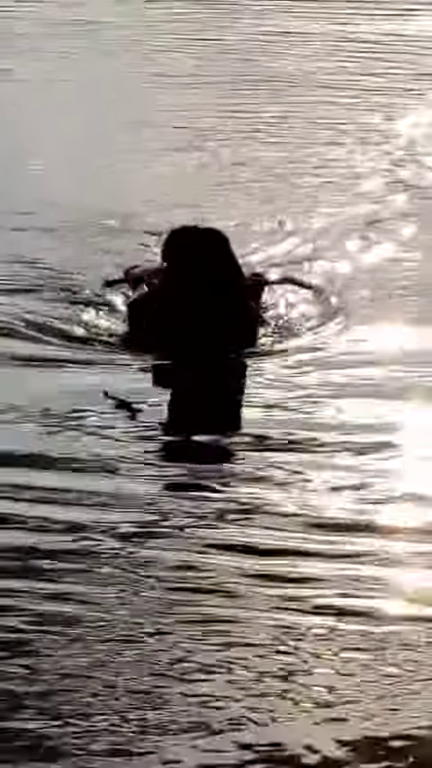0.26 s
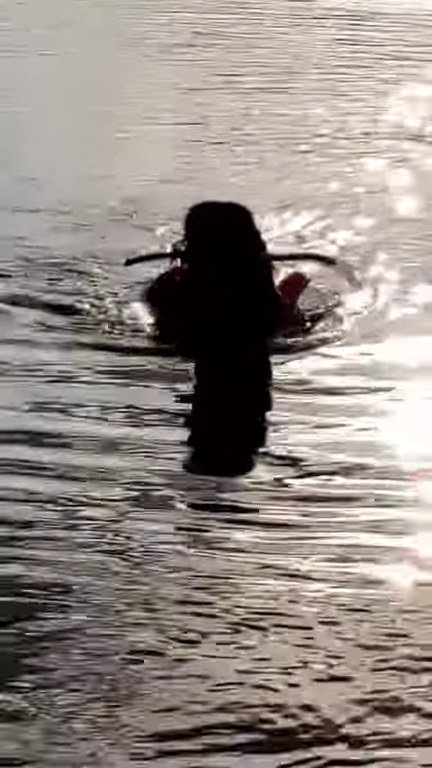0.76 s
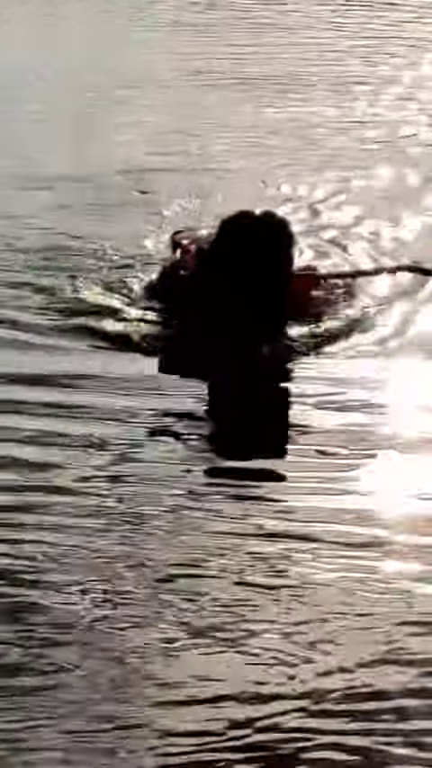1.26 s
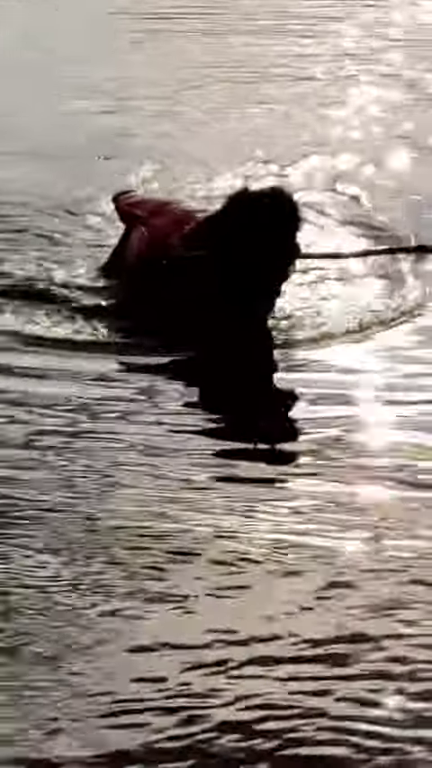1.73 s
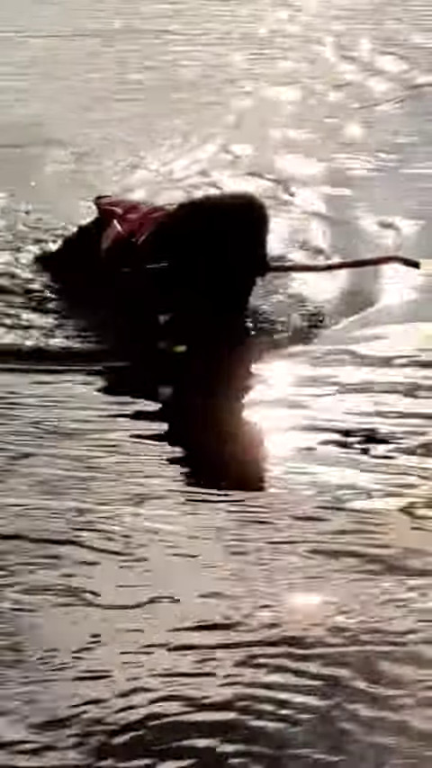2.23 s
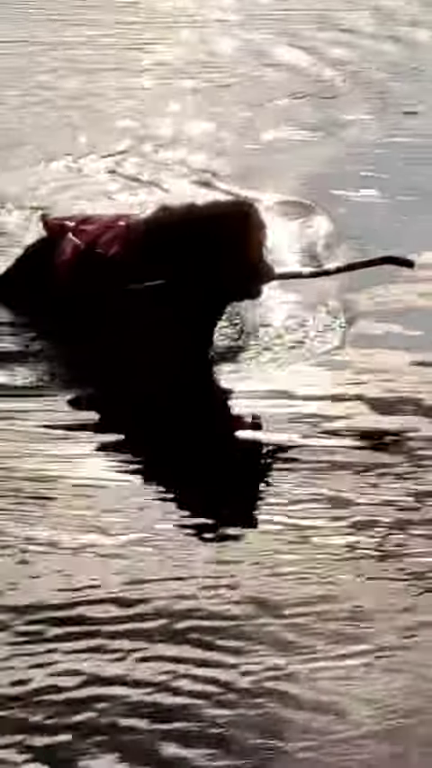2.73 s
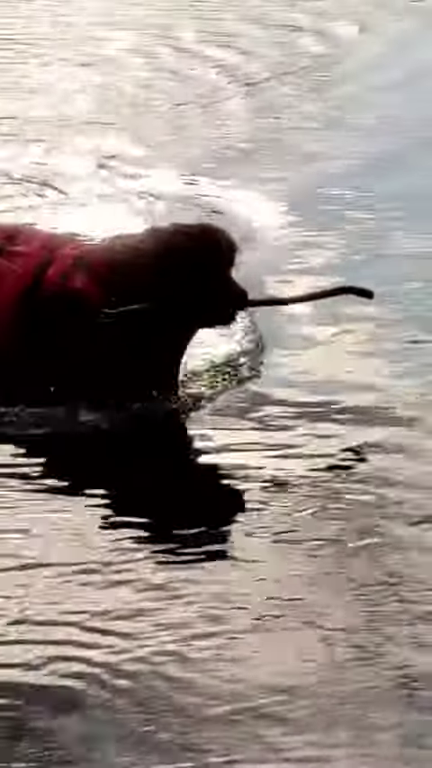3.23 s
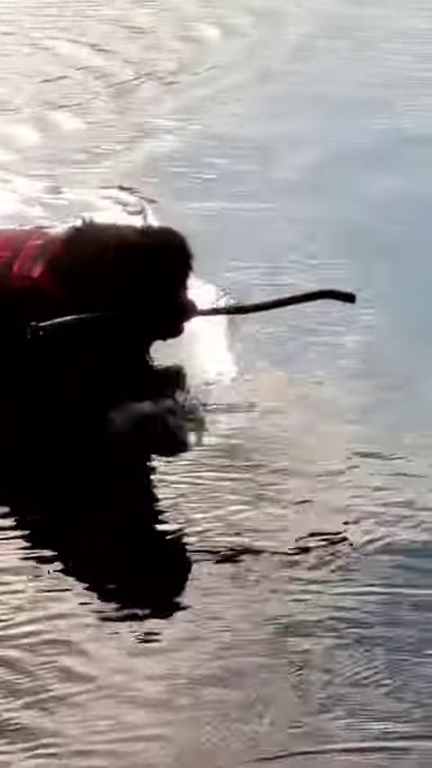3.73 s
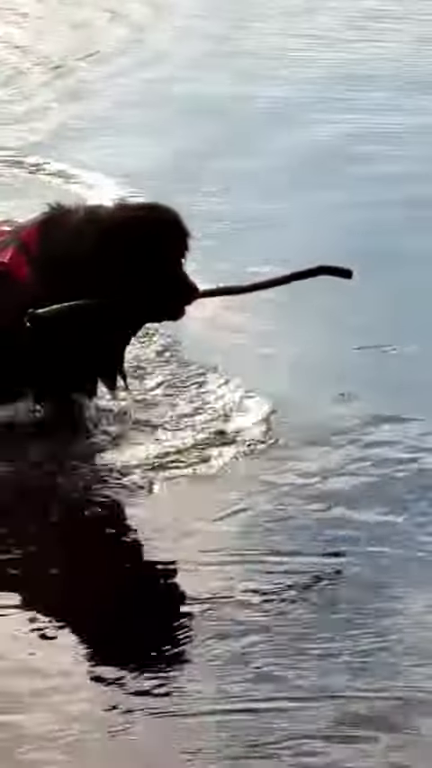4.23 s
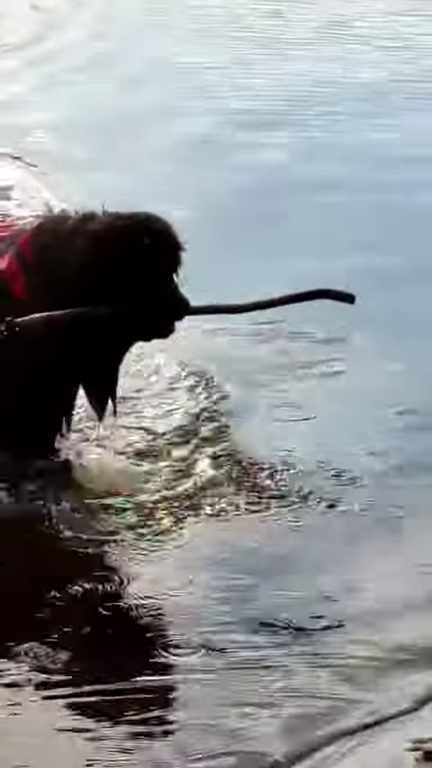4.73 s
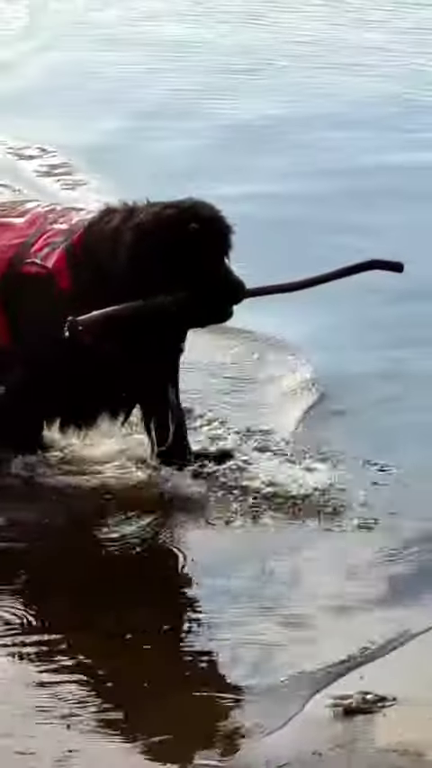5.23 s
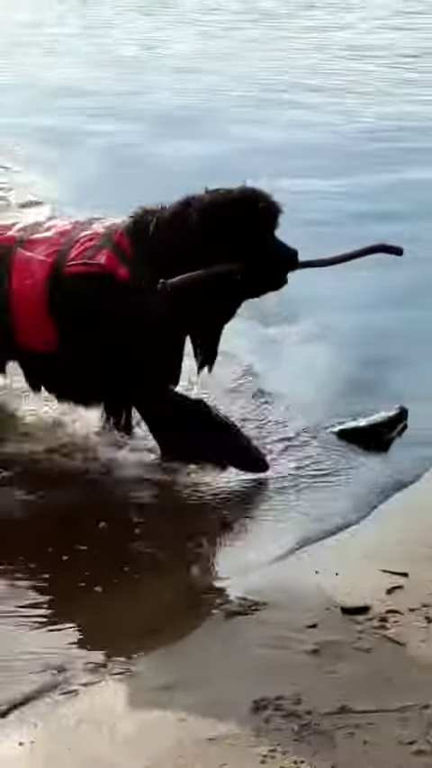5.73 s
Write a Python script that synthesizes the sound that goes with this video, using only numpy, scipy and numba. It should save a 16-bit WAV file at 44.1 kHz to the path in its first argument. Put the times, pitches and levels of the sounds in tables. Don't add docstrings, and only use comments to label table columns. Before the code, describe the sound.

Quiet watery paddling and a lull, then heavy wading splashes with gurgling bubbles and fine spray, over a low distant outdoor rumble.

```python
import sys
import numpy as np
from scipy import signal
from scipy.fft import rfft, irfft
from scipy.io import wavfile
from scipy.ndimage import uniform_filter1d
from numba import njit

SR = 44100
rng = np.random.default_rng(int(sys.argv[2]) if len(sys.argv) > 2 else 0)


def wav_record(signal):
    frames = np.transpose(np.atleast_2d(signal))
    bounded = np.clip(frames, -1, 1)
    quanta = np.round(bounded * 32767).astype(np.int16)
    wavfile.write(sys.argv[1], SR, quanta)


def magnitude_from_level(level_db):
    exponent = np.asarray(level_db, float) / 20
    return 10 ** exponent


N = 263277
HZ = np.maximum(np.arange(N // 2 + 1) * SR / N, 1)

# (frequency [Hz], level [dB])
WATER = [(100, -38), (170, 2.5), (500, -1.5), (1200, -7), (2240, -10.5), (2800, -14.5), (3200, -18.5),
         (4300, -23.5), (5700, -20), (7200, -13.5), (8600, -19), (9800, -31.5), (11500, -35), (14600, -35),
         (15700, -36)]


def rms_one(x):
    return x / np.sqrt(np.mean(x ** 2) + 1e-20)


def in_time(rows):
    s, *columns = np.transpose(rows)
    return [np.interp(np.arange(N) / SR, s, c) for c in columns]


def at_hz(points):
    hz, value = np.transpose(points)
    return np.interp(np.log(HZ), np.log(hz), value)


def band(low_hz, high_hz, order=3):
    low_cut = 1 + (low_hz / HZ) ** (2 * order)
    high_cut = 1 + (HZ / high_hz) ** (2 * order)
    return 1 / np.sqrt(low_cut * high_cut)


def drift(rate):
    r = np.exp(-80 * np.pi * rate / SR)
    coarse = rng.standard_normal(N // 40 + 2002)
    slow = signal.lfilter([1], [1, -2 * r, r * r], coarse)[2000:]
    return np.interp(np.arange(N) / 40, np.arange(len(slow)), rms_one(slow))


def wake():
    # (time [s], level [dB])
    churn = [(0, -63), (0.55, -62.5), (0.68, -68), (0.85, -63), (1.25, -61.5), (1.51, -74), (2.14, -68),
             (2.86, -73), (2.97, -60), (3.22, -58), (3.39, -63), (3.62, -55), (3.92, -47.5), (4.32, -55.5),
             (4.6, -53), (4.73, -61), (5.09, -50), (5.97, -50.5)]
    mean_churn_db = -60
    churn_db = in_time(churn)[0] - mean_churn_db
    slow_db = uniform_filter1d(churn_db, round(0.45 * SR))
    t = np.arange(N) / SR
    footing_s, shallows_s = 3.3, 5.1
    depth_db = 2.0 * np.minimum(t, footing_s) - 10 * np.maximum(t - shallows_s, 0)
    spray_surge, trickle_surge = surges()

    gurgle = swarm(count=3000, low_hz=190.8, high_hz=1266, cycles=19.0, uneven_db=2.5, clump_db=0.33, lag_spread=5.6)
    trickle = swarm(count=15000, low_hz=1216, high_hz=3910, cycles=18.0, uneven_db=2.5, clump_db=0.82, lag_spread=2.1)
    drops = swarm(count=7000, low_hz=3640, high_hz=10040, cycles=25.0, uneven_db=2.6, clump_db=2.5, lag_spread=1.5)
    fizz = swarm(count=40000, low_hz=3340, high_hz=16100, cycles=3.2, uneven_db=3.0, clump_db=0.7, lag_spread=0.76)
    spray = magnitude_from_level(-7) * drops + magnitude_from_level(-4.0) * fizz

    gurgle_level = magnitude_from_level(-58 + 0.5 * slow_db + depth_db)
    trickle_level = np.hypot(magnitude_from_level(-63.5 + 0.8 * churn_db), magnitude_from_level(-1.8) * trickle_surge)
    spray_level = np.hypot(magnitude_from_level(mean_churn_db - 2.5 + churn_db), magnitude_from_level(-0.6) * spray_surge)
    return gurgle_level * gurgle + trickle_level * trickle + spray_level * spray


def surges():
    # (time [s], spray [dB], trickle [dB], rise [s per 10 dB], fall [s per 10 dB])
    strokes = [(0.05, -56, -70, 0.05, 0.07), (0.08, -68, -49.5, 0.02, 0.018),
               (0.155, -58, -52.5, 0.03, 0.1), (0.28, -56, -62, 0.05, 0.05), (0.38, -55, -45, 0.02, 0.02),
               (0.45, -50, -54, 0.04, 0.045), (0.51, -56, -61, 0.012, 0.13), (0.75, -56, -53, 0.02, 0.008),
               (0.78, -70, -55, 0.01, 0.025), (1.05, -72, -50.5, 0.023, 0.009),
               (1.31, -70, -60, 0.08, 0.04), (2.18, -63, -76, 0.05, 0.022), (2.39, -66, -76, 0.02, 0.15),
               (2.58, -68, -76, 0.06, 0.12)]
    # (time [s], spray [dB], trickle [dB], rise [s per 10 dB], fall [s per 10 dB])
    strides = [(2.93, -61, -56, 0.027, 0.022), (2.99, -62, -56, 0.02, 0.2), (3.24, -55, -49, 0.2, 0.018),
               (3.3, -54, -54, 0.05, 0.06), (3.64, -49.5, -58, 0.06, 0.04), (3.72, -50, -54, 0.02, 0.05),
               (3.79, -56, -49, 0.15, 0.04), (3.86, -47.5, -49.5, 0.05, 0.08), (4.04, -48, -52, 0.15, 0.04),
               (4.16, -47, -52, 0.05, 0.08), (4.465, -46, -47.5, 0.13, 0.06), (4.57, -52, -60, 0.06, 0.1),
               (4.67, -48, -60, 0.03, 0.035), (4.92, -58, -49, 0.11, 0.04), (5.1, -40, -48, 0.012, 0.055),
               (5.19, -44, -48, 0.1, 0.015), (5.45, -60, -48, 0.2, 0.025), (5.56, -49, -47, 0.13, 0.2),
               (5.65, -58, -51, 0.04, 0.07), (5.8, -43.5, -50, 0.05, 0.12), (5.96, -62, -51, 0.02, 0.05)]
    t, out = np.arange(N) / SR, np.zeros((2, N))
    for s, spray_db, trickle_db, rise, fall in strokes + strides:
        near = slice(max(round((s - .5) * SR), 0), round((s + .5) * SR))
        shape = magnitude_from_level(-10 * np.maximum((s - t[near]) / rise, (t[near] - s) / fall))
        peaks = magnitude_from_level(np.array([[spray_db], [trickle_db]]))
        out[:, near] = np.maximum(out[:, near], peaks * shape)
    return out


def swarm(count, low_hz, high_hz, cycles, uneven_db, clump_db, lag_spread):
    when, pitch, big, long, sign = rng.random((5, count))
    hz = low_hz / 1.331 * (1.61 * high_hz / low_hz) ** pitch
    uneven = magnitude_from_level(uneven_db * np.minimum(-np.log(big), 5))
    size = hz * uneven * np.sign(sign - .5)
    lag = lag_spread * rng.standard_normal(count)
    rings = bubbles(when * N, size, hz, cycles * (.5 + long), np.full(count, .25), lag)
    clumps = magnitude_from_level(clump_db * (drift(6.4) + 0.27 * drift(16.7)))
    colour = magnitude_from_level(at_hz(WATER)) * band(low_hz, high_hz)
    return rms_one(irfft(rfft(rings * clumps) * colour, N))


@njit
def bubbles(start, size, hz, cycles, rise, lag):
    out = np.zeros((2, N))
    for k in range(len(start)):
        life = cycles[k] / hz[k] * SR
        for side in range(2):
            first = start[k] + (lag[k] if side == 0 else 0.)
            for i in range(max(int(first) + 1, 0), min(int(first + life), N)):
                age = (i - first) / life
                turns = cycles[k] * age * (1 + np.log(2) * rise[k] * (age - .3))
                envelope = min(8 * age, 1.) * np.exp(-np.log(1000) * age)
                out[side, i] += size[k] * envelope * np.sin(2 * np.pi * turns)
    return out


def plops(rows, gain_db, rise_octaves):
    s, db, hz, cycles = np.transpose(rows)
    return bubbles(s * SR, magnitude_from_level(db + gain_db), hz, cycles, np.full(len(s), rise_octaves), np.zeros(len(s)))


def gulps():
    # (time [s], peak [dB], pitch [Hz], length [cycles])
    leg_pockets = [(0.22, -36, 392, 10), (0.374, -32.5, 363, 16.5), (0.42, -35, 270, 11),
                   (2.95, -37, 250, 15), (3.157, -36, 355, 15), (3.188, -35, 200, 7.3),
                   (3.36, -37, 480, 26), (3.37, -33.5, 248, 9.3), (3.394, -34.5, 450, 18),
                   (3.561, -37, 406, 15), (3.6, -37.5, 380, 20), (3.847, -24, 420, 9.1),
                   (3.855, -27.5, 349, 20), (3.885, -28.5, 415, 6.2), (3.954, -33.5, 470, 23),
                   (4.082, -29, 450, 7), (4.091, -32, 495, 21), (4.204, -44, 407, 5.7),
                   (4.449, -27.5, 256, 6.4), (4.955, -37, 484, 24), (5.002, -33, 370, 15),
                   (5.015, -34, 296, 7.6), (5.057, -37, 606, 12), (5.105, -26.5, 495, 15),
                   (5.135, -38, 355, 8.8), (5.484, -34.5, 281, 24), (5.509, -35, 347, 22),
                   (5.535, -33.5, 232, 11)]
    # (time [s], peak [dB], pitch [Hz], length [cycles])
    chest_pockets = [(0.107, -42, 890, 20), (0.381, -34, 823, 33), (3.021, -38, 980, 16),
                     (3.52, -41, 895, 18), (3.752, -32, 1070, 22), (3.772, -34, 695, 22),
                     (3.858, -31.5, 1040, 18), (4.448, -29.5, 590, 15), (4.462, -25, 830, 8.6),
                     (4.914, -35, 730, 26), (5.176, -33, 720, 16), (5.186, -34, 703, 21),
                     (5.194, -28.5, 840, 9.6), (5.321, -35, 746, 26), (5.816, -32, 1170, 26)]
    return plops(leg_pockets + chest_pockets, gain_db=5.0, rise_octaves=0.17)


def drips():
    # (time [s], peak [dB], pitch [Hz], length [cycles])
    falling_drops = [(0.078, -32, 2010, 45), (0.189, -35, 1820, 30), (0.341, -38, 1990, 22),
                     (0.7327, -34.5, 1900, 24), (0.7874, -41, 1300, 16), (1.0399, -32, 2030, 55),
                     (1.3104, -41, 1540, 33), (2.2748, -40, 2220, 60), (2.68, -43, 1580, 30),
                     (2.9194, -42, 2010, 28), (2.982, -37.5, 1390, 43), (3.2719, -37, 1460, 20),
                     (3.6925, -37, 1960, 26), (3.7714, -32, 2070, 34), (3.8346, -32, 2170, 32),
                     (3.9094, -38, 1610, 20), (4.0022, -37, 1690, 27), (4.3364, -32.5, 2190, 60),
                     (4.4466, -31, 2040, 52), (5.0713, -31, 2100, 27), (5.106, -26.5, 2170, 60),
                     (5.3257, -38, 1930, 24), (5.4539, -32, 1330, 24), (5.5203, -35, 2230, 42),
                     (5.547, -31.5, 1210, 24), (5.6451, -32.5, 2100, 51), (5.8163, -23, 1500, 33),
                     (5.8324, -27.5, 1500, 31), (5.957, -27.5, 2340, 20), (0.222, -40, 1350, 20),
                     (0.42, -38, 3450, 30), (0.783, -41, 2400, 14), (1.05, -43, 3300, 30),
                     (3.0405, -45, 2770, 30), (3.494, -47, 2430, 30), (3.6322, -42, 2690, 25),
                     (3.7304, -37, 2510, 30), (3.7928, -40, 2580, 25), (4.122, -37, 2050, 25),
                     (4.376, -39, 2330, 30), (4.4757, -37, 2840, 25), (4.8908, -38, 2680, 25),
                     (5.367, -40, 3100, 35), (5.3962, -39, 2610, 30), (5.418, -39, 2850, 35),
                     (5.5468, -35, 2600, 40), (5.6361, -40, 2640, 30), (5.7768, -38, 2680, 35),
                     (5.793, -38, 3050, 40)]
    return plops(falling_drops, gain_db=-2.0, rise_octaves=0.2)


def spits():
    # (time [s], peak [dB], t60 [s])
    films = [(2.9562, -39.5, 0.016), (2.9926, -44, 0.023), (3.116, -48, 0.025), (3.2844, -49, 0.025),
             (3.4201, -49, 0.025), (3.487, -48, 0.023), (3.6329, -32, 0.018), (3.722, -37, 0.011),
             (3.79, -37.5, 0.025), (3.8437, -39, 0.055), (3.8846, -33, 0.025), (4.0882, -38, 0.023),
             (4.1444, -32, 0.029), (4.1999, -42, 0.048), (4.231, -41, 0.022), (4.347, -45.5, 0.019),
             (4.374, -36, 0.029), (4.4558, -34, 0.017), (4.671, -36, 0.024), (4.824, -46.5, 0.033),
             (4.8783, -47.5, 0.034), (5.1543, -36, 0.021), (5.3013, -38.5, 0.025), (5.351, -42, 0.025),
             (5.39, -30, 0.01), (5.493, -31, 0.0083), (5.5702, -39.5, 0.019), (5.7254, -36, 0.012),
             (5.768, -39, 0.043), (5.9284, -40, 0.022), (3.0525, -50, .015), (3.1607, -47, .015),
             (3.2286, -47, .015), (3.2495, -45, .012), (3.3294, -47, .015), (3.4057, -48, .012),
             (3.4621, -51, .012), (3.5548, -51, .015), (3.6007, -46, .015), (3.6616, -46, .015),
             (4.0243, -38, .015), (4.5685, -42, .015), (4.7217, -49, .015), (4.9108, -47, .015),
             (4.9592, -47, .015), (5.0544, -47, .015), (5.233, -46, .015), (5.5902, -40, .015),
             (5.6346, -43, .015), (5.7908, -38, .015), (5.8955, -41, .015)]
    # (time [s], peak [dB])
    ticks = [(0.1486, -42.5), (0.2494, -52), (0.268, -45), (0.3543, -51), (0.3805, -44), (0.4195, -43),
             (0.5105, -44), (0.6948, -54), (0.7426, -38), (0.7665, -40), (0.9137, -52), (1.1438, -55),
             (1.2794, -54), (1.6033, -51), (1.7295, -55.5), (1.8183, -60), (1.9001, -61), (2.0408, -55),
             (2.08, -52), (2.3967, -49.5), (2.4877, -56), (2.5564, -57), (2.5775, -51), (2.6544, -57),
             (2.745, -50.5), (2.819, -53.5), (2.8544, -55), (2.9208, -53)]
    # (time [s], peak [dB], t60 [s])
    slaps = [
        (0.381, -33, 0.044),
        (0.744, -43, 0.04),
        (1.044, -42, 0.04),
        (2.919, -37, 0.04),
        (3.847, -28, 0.044),
        (4, -33, 0.02),
        (4.084, -30, 0.04),
        (4.448, -25, 0.04),
        (4.89, -26.5, 0.04),
        (5.105, -24.5, 0.055),
    ]
    bright = films + [(s, db, 0.021) for s, db in ticks]
    high = bursts(bright, low_hz=4230, high_hz=13100, attack_s=0.0017, gain_db=-0.3)
    return high + bursts(slaps, low_hz=500, high_hz=3520, attack_s=0.0014, gain_db=-11)


def bursts(rows, low_hz, high_hz, attack_s, gain_db):
    level, age = np.zeros(N), np.arange(SR // 10) / SR
    for s, db, t60 in rows:
        at = round(s * SR)
        shape = np.minimum(age / attack_s, 1) * magnitude_from_level(db - 60 * age / max(t60, .002))
        level[at:at + len(age)] += shape[:N - at]
    shared, left, right = rng.standard_normal((3, N))
    noise = shared + .55 * np.array([left, right])
    colour = magnitude_from_level(at_hz(WATER)) * band(low_hz, high_hz)
    unit = np.std(irfft(rfft(noise) * colour, N))
    return magnitude_from_level(gain_db) * irfft(rfft(noise * level) * colour, N) / unit


def mist(water):
    # (time [s], level [dB])
    top_level = [(0, -8), (0.2, -8), (0.3, -30), (0.45, 0), (0.56, -70), (2.93, -70), (2.96, 2), (3.0, -25),
                 (3.2, 0), (3.28, -40), (3.35, 0), (3.4, -50), (3.55, -25), (3.63, 1), (5.97, 2)]
    top = irfft(rfft(water) * band(12900, SR, order=35), N)
    return water + (magnitude_from_level(in_time(top_level)[0]) - 1) * top


def swing(water):
    # (time [s], bearing [index])
    course = [
        (0, 0),
        (2.88, 0),
        (2.92, 1),
        (4.13, 1),
        (4.17, 2),
        (5.97, 2),
    ]
    # (frequency [Hz], left lead [rad])
    ahead = [(500, 0), (2900, 0), (3300, 1), (3900, 0), (4600, -.6), (5100, -2), (6200, -2.6), (7900, -1.7),
             (9300, 0)]
    # (frequency [Hz], left lead [rad])
    aside = [(500, 0), (1200, -.7), (1900, .6), (2300, -.5), (2850, -.3), (3250, -2.7), (3900, -3.6),
             (4700, -6.3), (5800, -7.3), (7200, -6.3), (7900, -7), (8800, -9.5), (12200, -9.5), (12700, 0)]
    phases = [at_hz(ahead), 1.16 * at_hz(aside), 0.88 * at_hz(aside)]
    bearing = in_time(course)[0]
    near = 0
    for k, phase in enumerate(phases):
        near = near + np.maximum(1 - abs(bearing - k), 0) * ports(water, phase)
    return near


def ports(x, phase):
    # (frequency [Hz], level [dB])
    balance = [(60, 2.5), (380, 6.5), (800, 2.5), (1550, 0), (2240, 6), (2700, .5), (3900, -2), (4300, -11),
               (4900, -6), (5500, -5), (7000, -8), (7800, -2.5), (9000, 0.5)]
    half = magnitude_from_level(at_hz(balance) / 2) * np.exp(.5j * phase)
    return irfft(rfft(x) * np.array([half, 1 / half]), N)


def rumble():
    # (frequency [Hz], level [dB per Hz])
    spectrum = [(8.8, -35), (15, -25.5), (54, -1), (112, -7.5), (191, 0), (253, -1.5), (538, -14.5),
                (916, -8), (1320, -17.5), (2800, -33), (3410, -47.5), (7250, -57.5), (8340, -57),
                (10400, -61), (12400, -55), (12900, -120), (22000, -120)]
    # (frequency [Hz], correlation [-1 to 1])
    likeness = [(60, 0.9), (180, 1), (550, 0.72), (1650, 0.089), (4970, 0.59), (15000, -0.69)]
    mid, side = rfft(rng.standard_normal((2, N)))
    alike = np.clip(at_hz(likeness), -1, 1)
    pair = np.sqrt(1 + alike) * mid + np.sqrt(1 - alike) * side * [[1], [-1]]
    far = rms_one(irfft(pair * magnitude_from_level(at_hz(spectrum)), N))
    swell_db = .5 * drift(2)
    return magnitude_from_level(-47 + swell_db) * far


def wind():
    # (time [s], peak [dB], length [s])
    puffs = [
        (0.68, -36, 0.037),
        (2.23, -38, 0.025),
    ]
    t, push = np.arange(N) / SR, 0
    for s, db, length in puffs:
        age = np.maximum(t - s, 0) / length
        push = push - magnitude_from_level(db) * 2.3 * np.sin(3.6 * age ** 0.57) * age * np.exp(-1.2 * age)
    buffet = rms_one(irfft(rfft(rng.standard_normal((2, N))) * band(1.7, 21, order=1), N))
    gust_db = -69 + 3 * drift(2.5)
    blown = push * magnitude_from_level(np.array([[1.5], [-1.5]])) + magnitude_from_level(gust_db) * buffet
    return irfft(rfft(blown) * band(.01, 2000), N)


def scene():
    water = mist(wake() + gulps() + drips() + spits())
    return swing(water) + ports(rumble(), phase=0) + wind()


def thrift(x, size=2048, count=7):
    # (frequency [Hz], level [dB])
    limits = [(2300, 30), (2600, 11.5), (3100, 9), (4000, 9.5), (4300, 13), (5000, 11.5), (8300, 11),
              (9200, 9), (12200, 9), (12700, 4), (16000, 3)]
    hz, _, (left, right) = signal.stft(x, SR, nperseg=size, noverlap=size // 2)
    four = np.array([left, right, left + right, left - right])
    bins = len(hz) // count * count
    power = (abs(four[:, :bins]) ** 2).reshape(4, -1, count, four.shape[-1]).sum(axis=2)
    power = np.repeat(uniform_filter1d(power, size=3, axis=-1), count, axis=1) + 1e-30
    under_db = 10 * np.log10(power[[1, 0, 3, 2]] / power)
    under_db[:2] += 3
    limit_db = np.interp(hz[:bins], *np.transpose(limits))[:, None]
    lost = (under_db > limit_db) & (under_db == under_db.max(axis=0))
    gone = np.zeros_like(four)
    gone[:, :bins] = four[:, :bins] * lost
    new_left = left - gone[0] - (gone[2] + gone[3]) / 2
    new_right = right - gone[1] - (gone[2] - gone[3]) / 2
    return signal.istft(np.array([new_left, new_right]), SR, nperseg=size, noverlap=size // 2)[1][:, :N]


def band_limit(x):
    return signal.sosfilt(signal.butter(12, 15700, fs=SR, output="sos"), x)


def record(dry):
    hiss = rms_one(irfft(rfft(rng.standard_normal((2, N))) * band(11300, 12650, order=35), N))
    cut = irfft(rfft(dry + magnitude_from_level(-99) * hiss) * band(1, 15700, order=60), N)
    mix = thrift(cut)
    return band_limit(mix)


dry = scene()
out = record(dry)
wav_record(out)
```